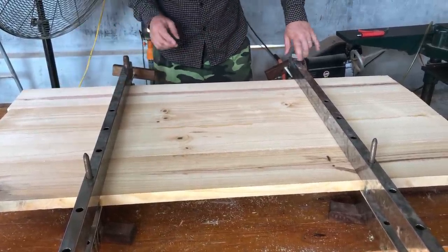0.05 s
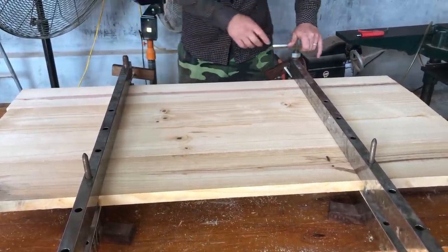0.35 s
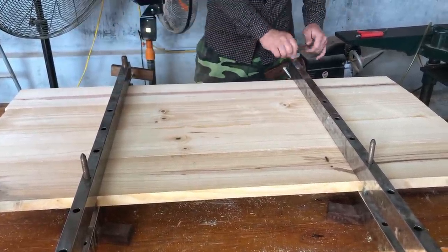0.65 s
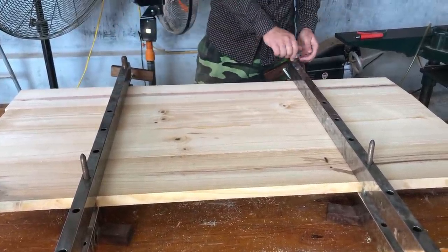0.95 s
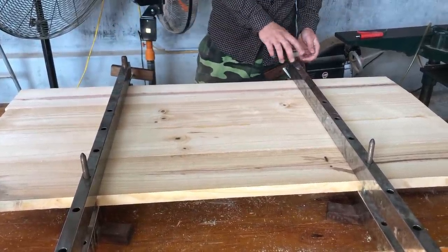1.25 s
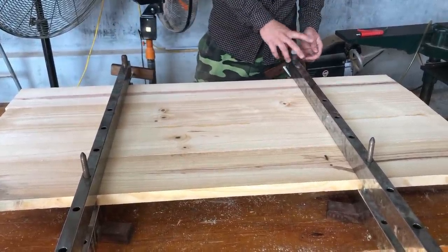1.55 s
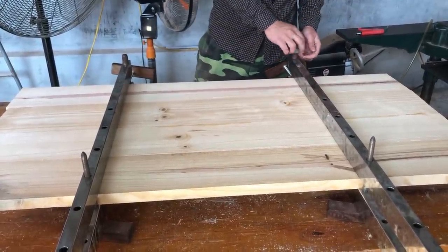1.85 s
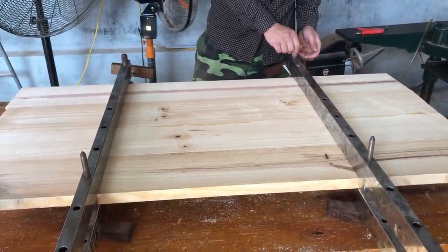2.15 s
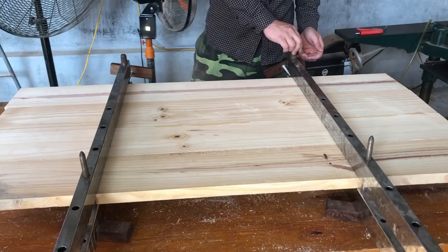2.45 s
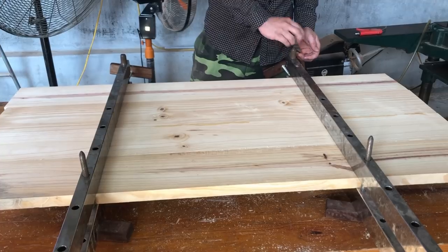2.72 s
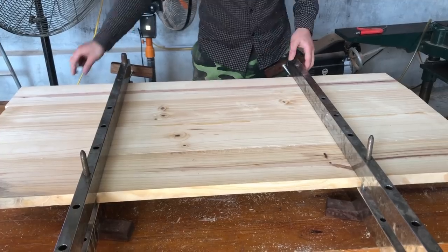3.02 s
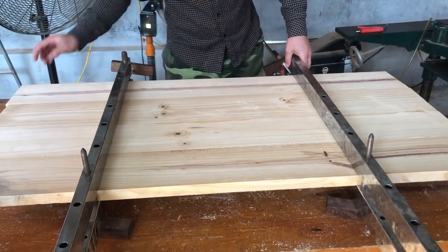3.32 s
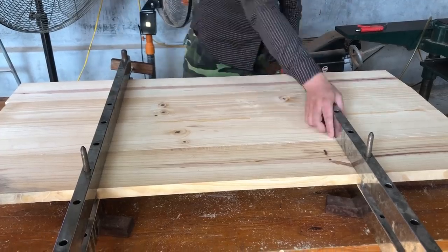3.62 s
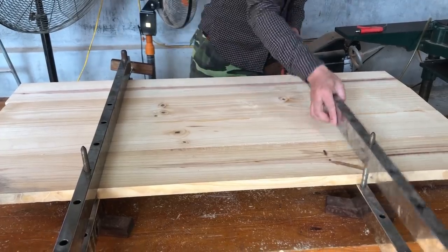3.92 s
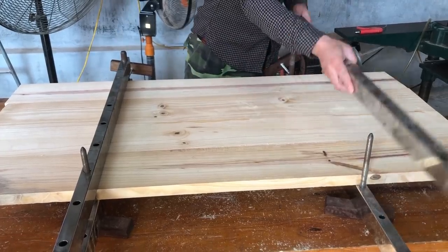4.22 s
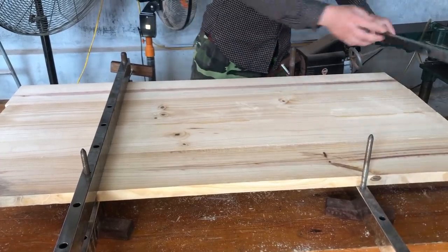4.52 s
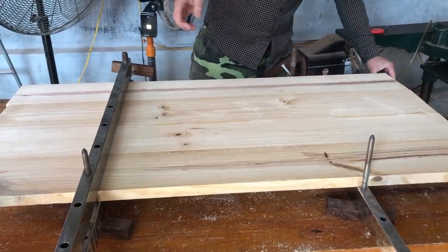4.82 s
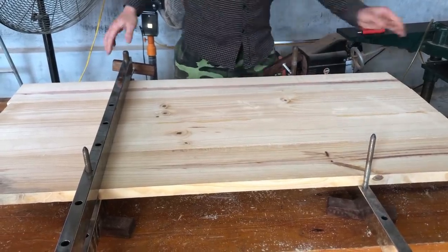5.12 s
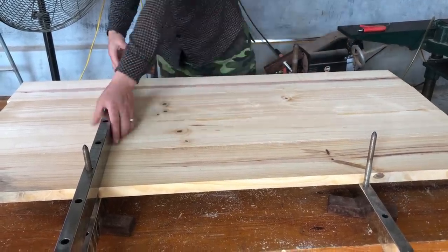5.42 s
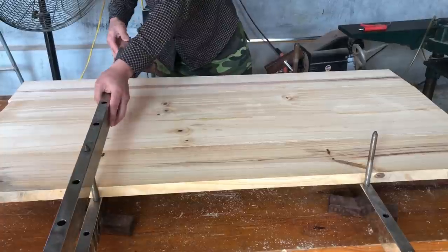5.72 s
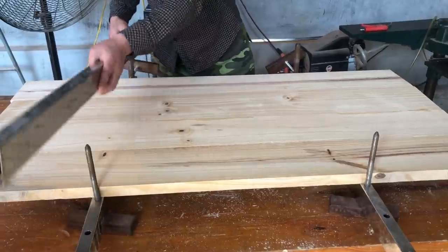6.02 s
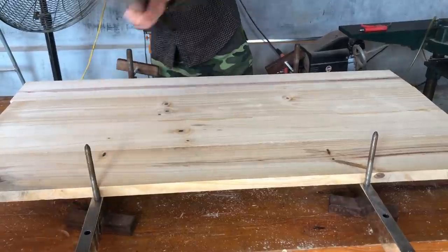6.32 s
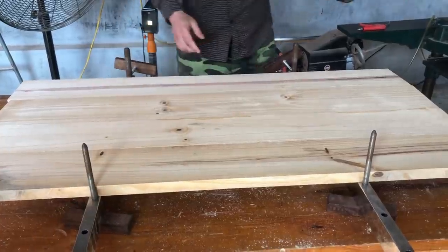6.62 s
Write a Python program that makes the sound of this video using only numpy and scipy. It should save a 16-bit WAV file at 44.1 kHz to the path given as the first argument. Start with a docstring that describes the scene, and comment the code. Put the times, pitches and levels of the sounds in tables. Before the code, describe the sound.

A workshop fan runs throughout with an airy hum, a light hiss and a faint tone that comes and goes. For the first three seconds or so a dry clamp screw is wound loose, rubbing softly while its handle gives small irregular clinks, with one short high squeak at about 2.5 seconds. From 3.4 to 4.3 seconds a steel bar clamp is dragged up its pin, much louder, chattering, ringing and briefly squealing as it thumps a wooden panel. The fan's whirr swells slightly around 4 seconds. Near 5 seconds the bar is stood on the floor with a knock and a quick ringing clank. From 5.6 to 6 seconds a second bar rattles, scrapes and squeals off. At about 6.2 seconds a loose steel jaw bounces in four quick fading clinks, leaving only the fan. The sound is nearly centred, with a short room echo.

```python
"""A workshop fan hums while a clamp screw is wound loose, with small scrapes, clinks and one squeak.
Then two steel bar clamps come off a glued wooden panel. Each bar chatters along its pin in stick-slip
clicks that ring the steel and thump the wood, and friction sets it squealing. Between the two lifts
the first bar is stood down beside the bench; at the end a loose jaw bounces to rest."""
import sys
import numpy as np
from scipy import signal
from scipy.fft import rfft, irfft
from scipy.io import wavfile
from scipy.ndimage import uniform_filter1d

SR = 44100
rng = np.random.default_rng(int(sys.argv[2]) if len(sys.argv) > 2 else 0)


def log_audio(samples):
    """Write samples as a 16-bit WAV file to the path given in sys.argv[1]."""
    # one column per channel
    frames = np.atleast_2d(samples).T
    # limit to full scale, then quantise
    limited = np.clip(frames, -1, 1)
    pcm = np.round(limited * 32767).astype(np.int16)
    wavfile.write(sys.argv[1], SR, pcm)


N = 302526
TIME = np.arange(N) / SR
SHORT = np.arange(SR // 2) / SR  # time within one blow

# spectra of the fan's air rush, its higher whirr and the hiss: f/Hz, level/dB
AIR_EQ = [(20, -26), (45, -19.5), (90, -9), (180, -16.5), (250, -7.5), (315, 1.5), (390, 0), (500, -8.5),
          (600, -7.5), (700, 1), (810, -1), (980, -12), (1300, -14.5), (1800, -16), (2400, -17),
          (3100, -13.5), (4000, -46.5)]
WHIRR_EQ = [(850, -39), (1130, 2), (1280, -7.5), (1460, 5), (1650, -32), (2500, -47)]
HISS_EQ = [(1760, -18), (3000, -0.5), (3680, 5), (4030, -4.5), (4320, -2), (4630, 0.5), (5040, 1),
           (5400, 2), (6710, -2.5), (8760, 0.5), (10500, -3), (12500, -2.5), (16000, -4)]
# fader curves for the fan's tone, the hiss and the rubbing thread: t/s, relative level/dB
TONE_FADER = [(0, -57), (.55, -33), (1.0, -53), (1.8, -50), (2.25, -33), (2.65, -45), (3.0, -33.5),
              (3.65, -45), (6.86, -50)]
HISS_FADER = [(0, -35), (1.0, -40.5), (2.25, -38), (2.75, -43.5), (3.25, -37), (3.65, -40), (4.4, -33.5),
              (4.8, -38.5), (6.3, -34), (6.86, -39.5)]
THREAD_FADER = [(0, -33.5), (.58, -28.5), (.72, -36), (1.2, -36), (1.68, -29), (1.9, -34), (2.18, -30),
                (2.75, -31), (2.95, -39), (3.22, -41), (3.4, -37)]
# spectra of scraping steel, rust grit and the wood's thump: f/Hz, level/dB
SCRAPE_EQ = [(60, -10), (200, -4.5), (500, 5.5), (900, -3), (1400, -2), (1800, -4.5), (2500, -0.5),
             (3300, -2), (4100, -6.5), (5000, -9), (6500, -13), (10000, -17.5), (16000, -20.5)]
GRIT_EQ = [(500, -25), (2500, 12.5), (5000, 9), (8000, 4), (11000, 6.5), (16000, -0.5)]
WOOD_EQ = [(25, -50), (55, -19), (85, -7.5), (114, 2), (170, -2.5), (260, -2.5), (310, -7.5), (400, -13),
           (600, -14.5), (1000, -22), (4000, -69)]
# the screw handle catching as it turns: t/s, length/s, level/dB
HANDLE_CATCHES = [(0.065, 0.0034, -29), (0.083, 0.012, -27.5), (0.159, 0.011, -31.5), (0.225, 0.022, -32.5),
                  (0.38, 0.032, -31), (0.562, 0.038, -32), (0.785, .008, -34), (0.947, 0.01, -34),
                  (1.128, 0.0093, -29), (1.280, .033, -31.5), (1.463, 0.016, -32), (1.962, 0.0065, -34),
                  (2.099, 0.0088, -33.5), (2.289, 0.017, -34), (2.595, 0.0036, -35.5),
                  (3.208, 0.0058, -31.5), (3.565, 0.002, -33)]
# steel locking briefly onto one note: t/s, length/s, f/Hz, level/dB
BRIEF_SQUEALS = [(0.083, 0.19, 4950, -45.5), (1.15, 0.033, 1785, -42), (2.452, 0.0092, 4580, -41.5),
                 (2.559, 0.019, 3690, -40.5), (5.639, 0.0036, 3280, -19.5)]
# partials of the screw's squeak: f/Hz, relative level/dB
SQUEAK_PARTIALS = [(2815, -22), (6724, -0.5), (9600, -22), (10630, -15), (13500, -9), (14520, -24)]
# modes of the handle, the jaw, each lifted bar and the stood bar: f/Hz, relative level/dB, t60/s
HANDLE_RING = [(1790, -3, 0.092), (2345, 2.5, 0.052), (2550, 4, 0.033), (3020, -6, 0.027),
               (3340, 1.5, 0.095), (4570, -12, 0.049)]
JAW_RING = [(1920, -16, .08), (2250, -3.5, 0.1), (2830, 1, 0.043), (3100, -1, 0.11), (3390, -2, 0.055),
            (4000, -5, 0.047), (4340, -1, 0.073), (6800, -12, .04), (8150, -19, 0.034)]
RIGHT_RING = [(1737, 3, 0.19), (1784, 8.5, 0.079), (1987, 0, 0.09), (2180, 2, 0.076), (2360, -3, 0.23),
              (2760, -9, 0.18), (3160, -11, 0.087), (4160, -15, 0.14), (5080, -10, 0.44), (7040, -35, .2)]
LEFT_RING = [(1360, -8, 0.1), (1870, 0, 0.036), (2220, 3.5, 0.057), (2550, 1.5, 0.12), (3190, 1, 0.027),
             (3580, -7, 0.06), (3930, -1.5, 0.045), (4470, -1, 0.035), (4620, -12, 0.061),
             (4850, -19, 0.16), (5900, -7, 0.044), (6600, -7, 0.088), (7630, -8.5, 0.062), (7230, -12, .11)]
STANDING_RING = [(515, -4.5, 0.5), (936, 1, 0.2), (1247, -15, .22), (1996, -0.5, 0.12), (2083, -5, 0.1),
                 (2600, -6, 0.099), (3120, -13, 0.14), (4030, -18, 0.087), (5701, -20, 0.11),
                 (6260, -23, .14)]
# clatter spectra of each lifted bar and of the bar meeting the floor: f/Hz, level/dB
RIGHT_EQ = [(60, -8), (250, 2.5), (600, -2), (900, -1), (1400, -2), (1900, 7), (2400, 1), (3200, -4),
            (4500, -13), (7000, -17.5), (16000, -25)]
LEFT_EQ = [(60, -21), (170, -3.5), (280, 6.5), (400, 2.5), (550, 1), (800, 2), (1100, -6), (2000, 0.5),
           (3100, -0.5), (4400, -8.5), (6000, -13), (10000, -21), (16000, -19.5)]
FLOOR_EQ = [(60, -20), (200, -7), (270, -2.5), (355, 2), (430, -2.5), (550, -5.5), (850, -10), (1300, -20),
            (2100, -17.5), (3000, -35), (4500, -40), (16000, -54)]
# each bar's voice: modes, clatter spectrum
BARS = {"right": (RIGHT_RING, RIGHT_EQ), "left": (LEFT_RING, LEFT_EQ),
        "standing": (STANDING_RING, FLOOR_EQ)}
# the note each bar squeals on: bar, f/Hz
BAR_NOTES = {"right": 1722, "left": 2232}
# a bar knocking on wood or floor: t/s, bar, clatter/dB, ring/dB, thump/dB, crack/dB
BAR_KNOCKS = [(3.435, "right", -23, -36, -36, -54), (3.457, "right", -20, -31, -25.5, -55),
              (3.725, "right", -28, -32, -22, -60), (3.776, "right", -23, -30, -19.5, -48),
              (3.804, "right", -17, -20.5, -18, -32), (3.917, "right", -16.5, -20, -13, -32),
              (3.990, "right", -22, -14.5, -40, -42), (4.155, "right", -41, -46, -28, -52),
              (4.238, "right", -21, -21.5, -19.5, -29.5), (4.256, "right", -22.5, -27, -22, -50),
              (4.851, "standing", -16, -37, -28, -52), (5.039, "standing", -27, -19, -24, -26),
              (5.049, "standing", -19, -15.5, -19, -38), (5.074, "standing", -18.5, -19, -22, -37),
              (5.627, "left", -19, -28, -40, -34), (5.724, "left", -23, -34, -27, -50),
              (5.782, "left", -25.5, -45, -31, -56), (5.816, "left", -17, -22, -33, -43)]
# a bar dragged along its pin: t/s, bar, length/s, clatter/dB, grit/dB, time to roughest spot/s, squeal/dB
BAR_SLIDES = [(3.411, "right", 0.062, -28, -55, 0.035, -42), (3.767, "right", 0.024, -23.5, -35, .016, -38),
              (3.902, "right", .02, -24.5, -46, .018, -27), (3.984, "right", 0.094, -17.5, -24, 0.038, -23),
              (4.234, "right", 0.013, -27, -42, .008, -15), (5.6, "left", 0.017, -28, -44, .01, -49),
              (5.639, "left", 0.0734, -17.5, -29, 0.022, -16),
              (5.721, "left", 0.019, -20, -31, .012, -17.5),
              (5.819, "left", 0.051, -22.5, -32, .045, -28.5), (5.946, "left", .079, -17.5, -21, .074, -22)]
# stereo width of the bars and of the centred screw and fan: f/Hz, side minus mid/dB
BAR_SPREAD = [(100, -33), (500, -29), (2000, -27), (4400, -20), (8000, -16), (14000, -12)]
CENTRE_SPREAD = [(100, -60), (1500, -59), (3500, -39.5), (6000, -20.5), (10000, -40), (16000, -44)]


def undb(db):
    """Decibels to gain."""
    return 10 ** (np.asarray(db) / 20)


def unit(x):
    """Scale to rms 1."""
    return x / np.sqrt(np.mean(x ** 2))


def burst(x, db, length):
    """Give a short sound the energy of a level held for its length plus a 25 ms ring-out."""
    return x * undb(db) * np.sqrt((length + .025) * SR / np.sum(x ** 2))


def add(track, s, x):
    """Mix a short sound into a track at time s."""
    start = max(int(s * SR), 0)
    track[start:start + len(x)] += x[:N - start]


def colour(x, eq, size=4096):
    """Minimum-phase EQ through points of f/Hz, level/dB, so nothing rings ahead of an attack."""
    hz, db = np.transpose(eq)
    bin_hz = np.arange(size // 2 + 1) * SR / size
    log_gain = np.log(undb(np.interp(np.log(bin_hz + 1), np.log(hz), db)))
    cepstrum = irfft(log_gain)[:size // 2]
    cepstrum[1:] *= 2
    response = irfft(np.exp(rfft(cepstrum, size)))
    return signal.fftconvolve(x, response)[:len(x)]


def drift(rate):
    """Smooth random wander through `rate` new values a second, spread near 1."""
    hold = int(SR / rate)
    steps = np.repeat(rng.standard_normal(N // hold + 1), hold)
    return 0.995 * uniform_filter1d(steps, hold)[:N]


def cloud(t60, rise):
    """A wash of close modes or echoes: decaying noise of unit energy."""
    response = rng.standard_normal(len(SHORT)) * undb(-60 * SHORT / t60) * (1 - np.exp(-SHORT / rise))
    return response / np.linalg.norm(response)


def room(x, early_db, late_db, early_t60=0.12, late_t60=0.39):
    """Direct sound, quick reflections off bench and panel, and the workshop's tail."""
    response = undb(early_db) * cloud(early_t60, rise=0.0049)
    response += undb(late_db) * cloud(late_t60, rise=0.015)
    response[0] += 1
    return signal.fftconvolve(x, response)[:len(x)]


def fan(tone_hz=718, waver=0.0199, air_db=-36, whirr_peak_s=4.17, whirr_hold_db=-43):
    """The bed: rushing air, a tone that comes and goes, a whirr that swells and settles, and hiss."""
    air, whirr, hiss = rng.standard_normal((3, N))
    # turbulence bends the tone's pitch and strength
    pitch = tone_hz * (1 + waver * drift(70))
    tone = np.sin(2 * np.pi * np.cumsum(pitch) / SR) * undb(2.2 * drift(25.03))
    tone_db = np.interp(TIME, *np.transpose(TONE_FADER)) - 2.5
    hiss_db = np.interp(TIME, *np.transpose(HISS_FADER)) - 3
    # the whirr climbs 17 dB a second and overshoots its held level by 7 dB
    since_peak = TIME - whirr_peak_s
    swell_db = 17 * np.minimum(since_peak, 0) + 7 * np.exp(-np.maximum(since_peak, 0) / .4)
    out = unit(colour(air, AIR_EQ)) * undb(air_db + 2.2 * drift(4.3))
    out += unit(tone) * undb(tone_db)
    out += unit(colour(whirr, WHIRR_EQ)) * undb(whirr_hold_db + swell_db)
    return out + unit(colour(hiss, HISS_EQ)) * undb(hiss_db + 1.5 * drift(8.8))


def chatter(length, rate=950, scatter_db=4.5, blow=0.44, release=0.0031):
    """Contact force: a first blow, then stick-slip clicks while the surfaces slide."""
    slips = rng.random(len(SHORT)) < rate / SR
    sizes = undb(scatter_db * np.clip(rng.standard_normal(len(SHORT)), -2, 1))
    signs = rng.choice([-1, 1], len(SHORT))
    force = slips * sizes * signs * np.exp(-np.maximum(SHORT - length, 0) / release)
    force[0] += blow * np.linalg.norm(force) + 1e-9
    return force


def resonate(x, hz, t60):
    """One decaying mode."""
    pole = np.exp((2j * np.pi * hz - np.log(1000) / t60) / SR)
    return signal.lfilter([1], [1, -pole], x).imag


def ring(force, modes, scatter_db=0.0, detune=0.0076):
    """Modes of a steel part; contact point and grip vary their strength and pitch from blow to blow."""
    chance = rng.standard_normal((len(modes), 2))
    return sum(undb(db + scatter_db * louder) * unit(resonate(force, hz * (1 + detune * sharper), t60))
               for (hz, db, t60), (louder, sharper) in zip(modes, chance))


def shake(force, ring_t60=0.16, ring_db=-3):
    """Bending waves smear each click over milliseconds, then linger as a dense ring."""
    smear = cloud(t60=.012, rise=.0005)
    tail = undb(ring_db) * cloud(ring_t60, rise=0.0011)
    return signal.fftconvolve(force, smear + tail)[:len(force)]


def clinks(events, modes, ring_db):
    """A small loose steel part: a short scrape and its own ring."""
    out = np.zeros(N)
    for s, length, db in events:
        force = chatter(length, rate=900, blow=0.36, release=0.004)
        scrape = colour(shake(force, ring_t60=0.23, ring_db=-2.5), SCRAPE_EQ)
        ringing = ring(force, modes, scatter_db=4.0, detune=0.0183)
        add(out, s, burst(unit(scrape) + undb(ring_db) * unit(ringing), db, length))
    return out


def faint_ticks(rate=7, length=0.013, softest_db=-40):
    """Small catches of the handle at uneven moments while the screw turns."""
    turning_s = THREAD_FADER[-1][0]
    chance = rng.random((int(turning_s * rate), 2))
    ticks = [((k + when) / rate, length, softest_db + 2 * size) for k, (when, size) in enumerate(chance)]
    return clinks(ticks, HANDLE_RING, ring_db=-4.5)


def screw(grains_per_s=1500, rub_trim_db=-7):
    """The dry thread rubs in fine grains, and the loose handle clinks at every push of the fingers."""
    grains = rng.standard_normal(N) * (rng.random(N) < grains_per_s / SR) * undb(2.5 * drift(45))
    rub_db = np.interp(TIME, *np.transpose(THREAD_FADER), right=-120) + rub_trim_db
    rub = unit(colour(shake(grains), SCRAPE_EQ)) * undb(rub_db)
    return rub + clinks(HANDLE_CATCHES, HANDLE_RING, ring_db=-4)


def friction_tone(length, hz, glide, waver, edge_s=0.006):
    """A self-excited note that builds while the steel slips and dies when it stops."""
    progress = np.minimum(SHORT / length, 1)
    pitch = hz * (1 + glide * (progress - .5) + waver * drift(247)[:len(SHORT)])
    swell = np.minimum(SHORT / edge_s, 1) * np.exp(-np.maximum(SHORT - length, 0) / edge_s)
    flutter = undb(1.6 * drift(203)[:len(SHORT)])
    return swell * flutter * np.sin(2 * np.pi * np.cumsum(pitch) / SR)


def squeals(sag=0.034):
    """Steel sings briefly on steel, each note sagging as the slip slows."""
    out = np.zeros(N)
    for s, length, hz, db in BRIEF_SQUEALS:
        note = friction_tone(length, hz, glide=-sag, waver=0.013)
        add(out, s, burst(room(note, early_db=-9, late_db=-13), db, length))
    return out


def squeak(start_s=2.467, length=0.017, level_db=-23):
    """The screw gives one high friction squeak with several partials."""
    out = np.zeros(N)
    partials = sum(undb(db) * unit(friction_tone(length, hz, glide=0, waver=0.0047))
                   for hz, db in SQUEAK_PARTIALS)
    add(out, start_s, burst(room(partials, early_db=-6, late_db=-26, early_t60=0.16), level_db, length))
    return out


def jaw(start_s=6.15, gap_s=.0362, contact_s=0.0064, first_db=-20.5, loss_db=4, count=4):
    """The loose jaw bounces on the lifted bar, each clink weaker than the last."""
    bounces = [(start_s + k * gap_s, contact_s, first_db - k * loss_db) for k in range(count)]
    return clinks(bounces, JAW_RING, ring_db=1)


def bar_contact(bar, force, grinding, length, clatter_db, ring_db, thump_db, grit_db, wood_lag_s=0.00596):
    """Each contact rattles the bar, rings its modes, thumps the wood under it and grinds a little rust."""
    modes, clatter_eq = BARS[bar]
    clatter = room(colour(shake(force), clatter_eq), early_db=-13.5, late_db=-14)
    ringing = ring(force, modes)
    grit = room(colour(grinding, GRIT_EQ), early_db=6, late_db=-7, early_t60=0.054)
    thump = room(colour(force, WOOD_EQ), early_db=5, late_db=-2.5)
    steel = burst(clatter, clatter_db, length) + burst(ringing, ring_db, length)
    # the heavy wood takes a moment to get moving
    wood = np.pad(burst(thump, thump_db, length), (int(wood_lag_s * SR), 0))[:len(steel)]
    return steel + burst(grit, grit_db, length) + wood


def knocks(contact_s=0.0052, crack_s=.0012, rebound_s=.026):
    """A bar strikes with a bright steel crack, hops and lands once more, softer and woodier."""
    out = np.zeros(N)
    for s, bar, clatter_db, ring_db, thump_db, crack_db in BAR_KNOCKS:
        crack = colour(rng.standard_normal(len(SHORT)) * np.exp(-SHORT / crack_s), GRIT_EQ)
        add(out, s, burst(room(crack, early_db=-3, late_db=-8, early_t60=0.079), crack_db, crack_s))
        for delay, steel_db, wood_db in [(0, 0, 0), (rebound_s, -10, -6)]:
            force = chatter(contact_s)
            hit = bar_contact(bar, force, force, contact_s, clatter_db + steel_db, ring_db + steel_db,
                              thump_db + wood_db, grit_db=ring_db + steel_db - 17)
            add(out, s + delay, hit)
    return out


def slides(attack_s=0.0024, ease_db_per_s=23, grit_fall_db_per_s=200):
    """A bar chatters up its pin and over a rusty spot, squealing near its strongest mode."""
    out = np.zeros(N)
    for s, bar, length, db, grit_db, roughest_s, squeal_db in BAR_SLIDES:
        bite = np.minimum(SHORT / attack_s, 1) * undb(-ease_db_per_s * SHORT)
        force = chatter(length, rate=1100, blow=0) * bite
        grinding = force * undb(-grit_fall_db_per_s * np.abs(SHORT - roughest_s))
        drag = bar_contact(bar, force, grinding, length, clatter_db=db, ring_db=db - 4.5,
                           thump_db=db - 13.5, grit_db=grit_db)
        add(out, s, drag)
        note = friction_tone(length, BAR_NOTES[bar], glide=0.01, waver=0.011)
        add(out, s, burst(room(note, early_db=-19, late_db=-10), squeal_db, length))
    return out


def scene():
    """A narrow stereo mix: the bar hits widen in the treble, while screw and fan stay near the centre
    with a little width around 6 kHz."""
    bars = knocks() + slides() + jaw()
    centre = fan() + screw() + squeals() + squeak() + faint_ticks()
    mid = bars + centre
    width = colour(bars, BAR_SPREAD) + colour(centre, CENTRE_SPREAD)
    side = signal.fftconvolve(width, cloud(t60=.025, rise=.0002))[:N]
    return np.array([mid + side, mid - side])


def record(dry):
    """Master chain: soft-clip the highest peaks and cut the very top."""
    ceiling, top_hz = .9, 15900
    rounded = dry / (1 + (dry / ceiling) ** 4) ** (1 / 4)
    return signal.sosfilt(signal.ellip(10, .2, 80, top_hz, fs=SR, output="sos"), rounded)


dry = scene()
out = record(dry)
log_audio(out)
```